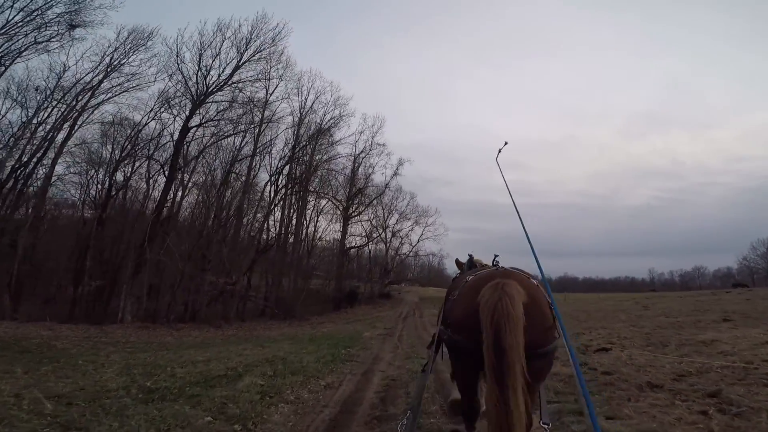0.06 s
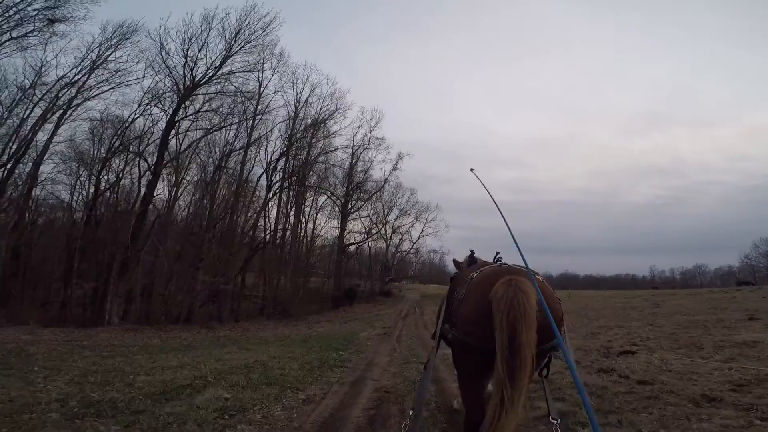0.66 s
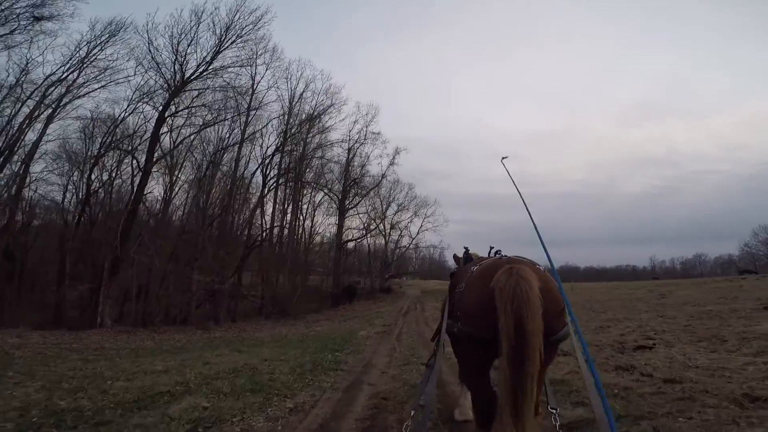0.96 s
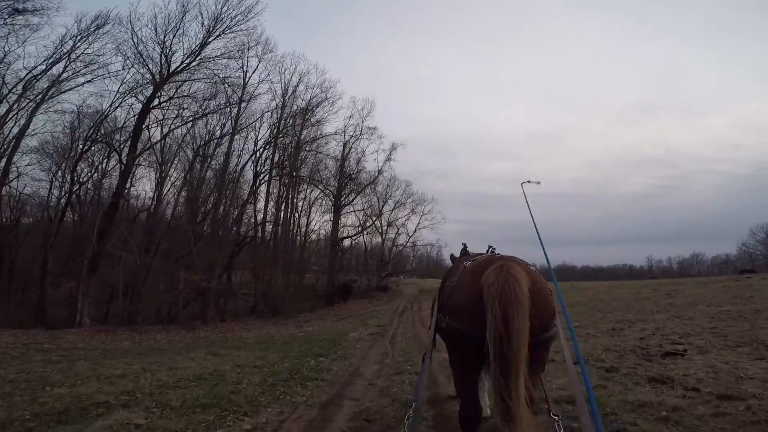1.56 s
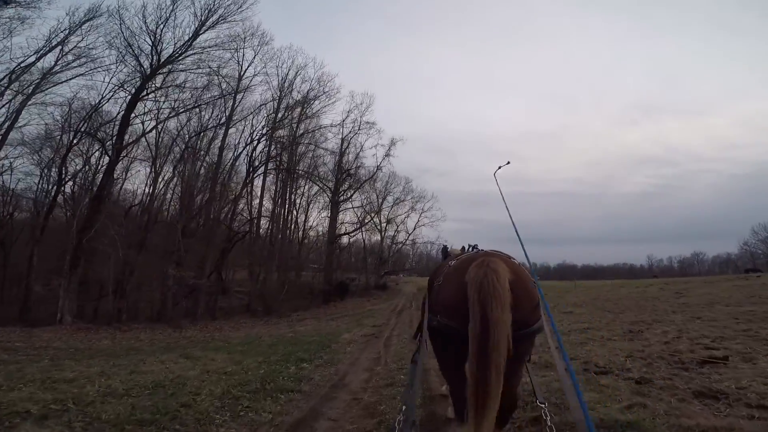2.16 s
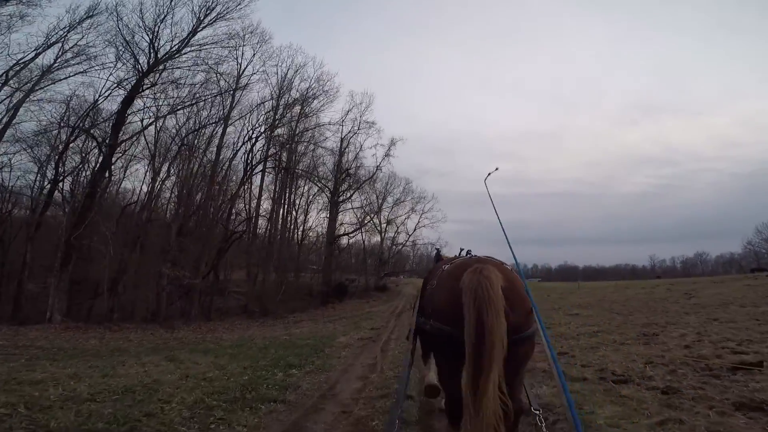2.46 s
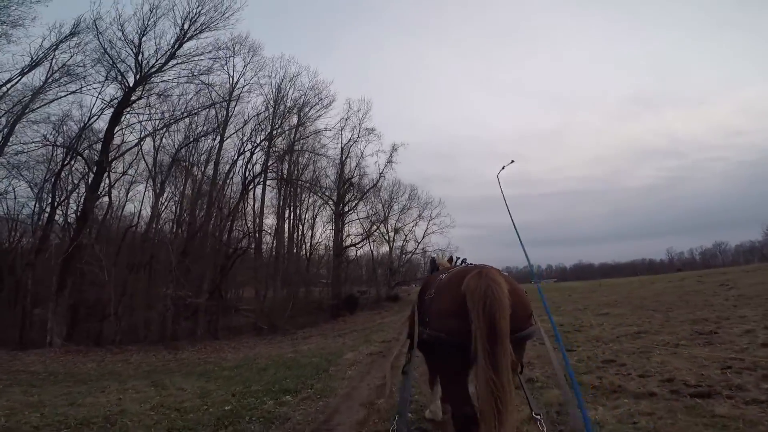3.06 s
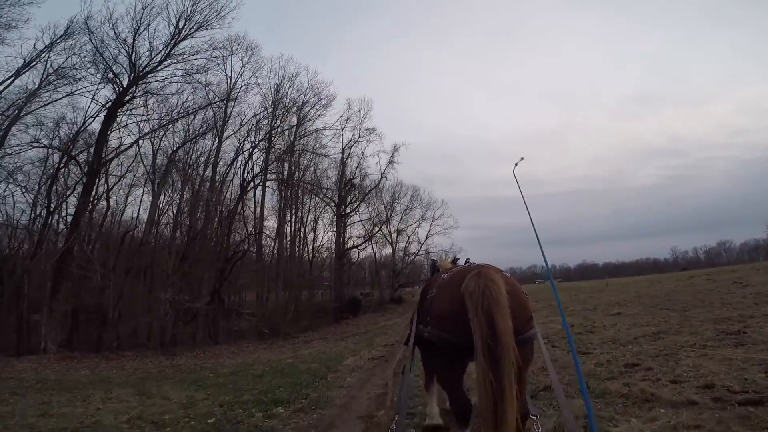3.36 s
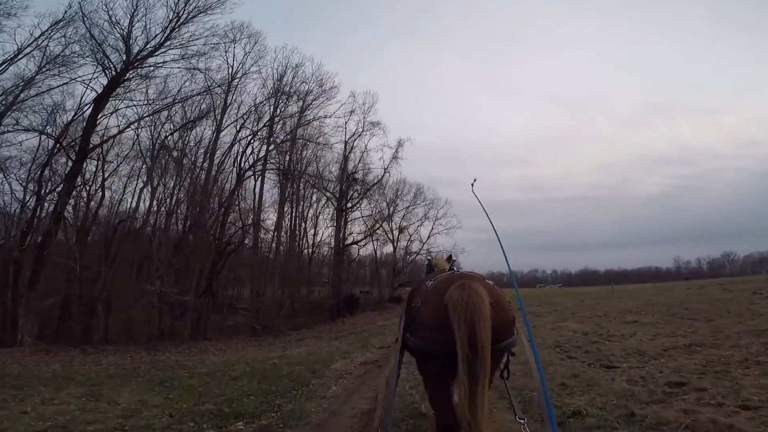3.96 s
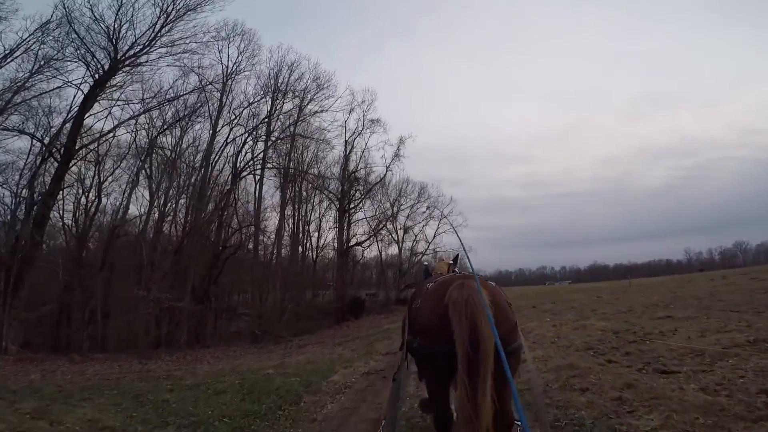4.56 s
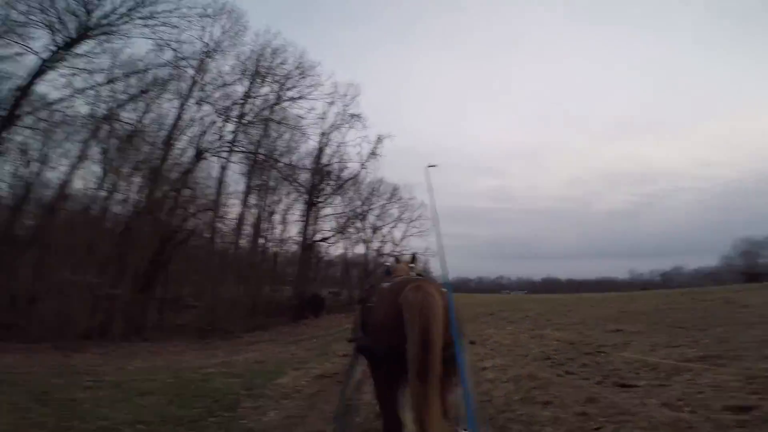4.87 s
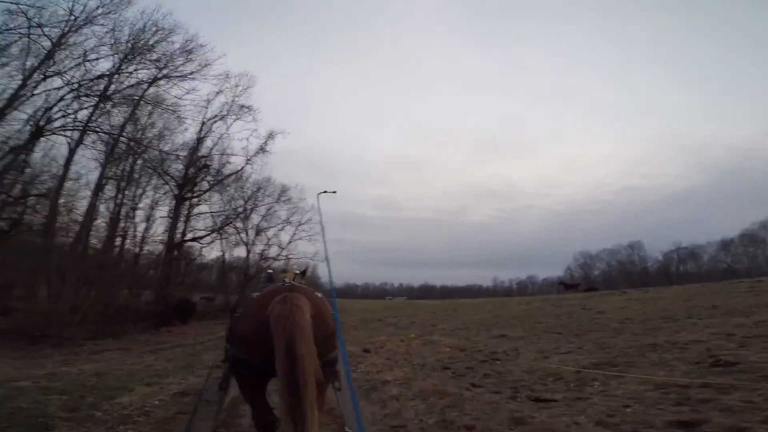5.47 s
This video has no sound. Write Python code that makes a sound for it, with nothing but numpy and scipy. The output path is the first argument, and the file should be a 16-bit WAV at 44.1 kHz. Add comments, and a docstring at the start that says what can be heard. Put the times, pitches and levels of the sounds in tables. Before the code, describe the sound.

A walking horse pulls a wooden sled across an open field, heard close up from the seat. The runners scrape and thump over clods with a low rumble, while grass hisses and wind buffets the microphone. Hooves crunch dry turf, chains click and boards knock. The ride grows smoother, then the hitch snaps taut with a sharp clack. Near the end come more bumps and two faint bird chirps on the left.

```python
"""A walking horse drags a wooden sled through an open field, heard from the seat. From the start grass
hisses, air buffets the microphone ports, and the runners scrape over clods that jolt the bed and drive
its resonances into a rumble. Hooves soon crunch into dry turf while chains click and wood knocks. By two
seconds the ground is smoother. Near 3.4 s friction makes a runner sing hoarsely, and the hitch snaps taut.
Near the end a small bird chirps twice on the left, with a last run of bumps between its calls."""
import sys
import numpy as np
from scipy import signal
from scipy.fft import rfft, irfft, next_fast_len
from scipy.io import wavfile
from scipy.ndimage import uniform_filter1d, map_coordinates

SR = 44100
rng = np.random.default_rng(int(sys.argv[2]) if len(sys.argv) > 2 else 0)


def bounce(signal):
    """Save signal as a 16-bit WAV file at the path given by the first command-line argument."""
    frames = np.transpose(np.atleast_2d(signal))
    limited = np.clip(frames, -1, 1)
    pcm = np.round(limited * 32767).astype(np.int16)
    wavfile.write(sys.argv[1], SR, pcm)


N = 242981

# Spectra of air, grass, dry stalks and earth. Each row: frequency in Hz, relative density in dB.
BUFFET_SPECTRUM = [(8, -8), (25, 12), (58, 14.5), (80, 15.5), (125, -15), (400, -107)]
GRASS_SPECTRUM = [(600, 2.5), (1200, 6), (1900, 6), (2500, 3.5), (3200, 4), (4500, 4), (6100, 5),
                  (7400, 1.5), (8300, -3), (9700, -6.5), (11200, -13.5), (12500, -12.5), (15000, -29)]
STALK_SPECTRUM = [(900, -34), (2200, 5), (3600, 3.5), (6200, 4.5), (7300, -1.5), (8400, -10.5),
                  (11000, -22.5), (15000, -54)]
EARTH_SPECTRUM = [(250, 9), (550, 9), (800, 10), (1150, 12), (1800, 3.5), (2800, -5), (6000, -60)]
# The bass over time. Each row: time in seconds, relative levels of the bed's boom and of buffeting in dB.
BASS_LEVELS = [(0.0, -44, -34.5), (0.38, -29, -42), (0.64, -29.5, -33), (0.79, -20.5, -24),
               (0.89, -26, -27.5), (1.1, -23.5, -23), (1.15, -31, -30), (1.35, -21, -25.5),
               (1.58, -30.5, -35), (2.01, -45.5, -39.5), (3.18, -57.5, -51), (3.38, -48, -38),
               (3.6, -55, -58), (3.9, -54, -59), (4.37, -69, -64), (4.6, -63, -68), (4.88, -72, -68),
               (4.98, -76, -54.5), (5.34, -51, -47), (5.51, -54, -51)]
# Thickness of the grass along the way. Each row: time in seconds, relative hiss level in dB.
GRASS_LEVELS = [(0.0, -42), (0.8, -43), (2.88, -46.5), (3.33, -45.5), (4.07, -47), (5.51, -46)]
# Bird calls. Each row: start and length in seconds, held pitch in Hz, relative level in dB,
# final fall as a fraction of the pitch.
CHIRPS = [(4.309, .058, 4400, -54, .05), (5.423, .066, 4340, -48.5, .25)]
# Shivers of the hitch chains. Each row: time of the peak in seconds, level in dB.
JINGLES = [(0.125, -47), (2.025, -50.5), (3.03, -51.5)]
# Links click and stems snap. Each row: start in seconds, relative noise level in dB, pitch in Hz,
# half bandwidth in octaves, level of the link's note in dB.
CLICKS = [(0.915, -31.5, 1890, 0.36, -45), (1.2635, -28.5, 2300, 0.47, -42),
          (1.266, -29.5, 6000, 0.18, -40), (1.468, -30.5, 4800, 0.53, -50), (1.541, -30, 2440, 0.27, -46),
          (1.554, -48, 3400, 0.53, -48), (1.688, -32.5, 4660, 0.16, -38), (1.695, -29, 4350, 0.28, -47),
          (1.992, -29, 5750, 0.092, -36), (2.4212, -30, 5300, 0.35, -35), (2.4241, -22.5, 3740, 0.84, -44),
          (2.648, -36.5, 6640, 0.25, -52), (2.9518, -31.5, 2900, 0.38, -35),
          (3.181, -32.5, 4400, 0.59, -50), (3.382, -31, 3600, 0.57, -52), (3.956, -31.5, 3350, 0.7, -27),
          (3.979, -29, 5060, 0.25, -42), (3.9801, -31.5, 3250, 0.35, -35), (4.354, -38, 3320, 0.1, -47),
          (4.361, -35.5, 2900, 0.79, -45), (4.42, -36, 2400, 0.78, -48), (4.572, -30, 2000, 1.4, -53)]
# The hitch snaps taut and rebounds. Each row: start in seconds, level in dB.
CLACKS = [(3.4761, -15), (3.5006, -21)]
# Loose boards and the hitch bar knock. Each row: start in seconds, level in dB, pitch in Hz,
# 60 dB decay time in seconds.
KNOCKS = [(0.456, -23, 703, 0.088), (0.584, -21.5, 595, .025), (0.617, -15, 1080, 0.035),
          (0.783, -25, 720, 0.043), (0.914, -23, 1020, .022), (1.033, -27, 520, 0.028),
          (1.216, -21, 600, 0.022), (1.541, -28, 1140, 0.016), (1.682, -24, 590, 0.019),
          (1.746, -22, 1070, 0.027), (1.8, -23, 1090, 0.026), (1.803, -23.5, 503, 0.058),
          (1.89, -24.5, 1070, 0.034), (1.991, -19.5, 1614, 0.025), (2.42, -19.5, 540, 0.016),
          (2.951, -23, 480, 0.02), (3.221, -24.5, 1090, 0.024), (3.344, -21.5, 996, 0.025),
          (3.4755, -12, 860, 0.0066), (3.602, -23, 1410, 0.019), (3.628, -28.5, 950, 0.04),
          (4.5708, -13.5, 424, 0.023), (4.583, -19, 1070, 0.016), (4.71, -27, 690, 0.1),
          (5.124, -25.5, 910, 0.026), (5.164, -26, 1170, 0.014), (5.257, -23.5, 483, 0.065),
          (5.265, -29, 1480, 0.024), (5.306, -28, 950, .022)]
# Hoof falls. Each row: landing time in seconds, relative levels of the earth and of the stalks in dB.
HOOF_FALLS = [(0.81, -44, -37.5), (0.922, -36, -44), (1.265, -35, -34.5), (1.545, -29, -30),
              (1.69, -45, -38), (1.809, -40, -50), (1.835, -33.5, -38.5), (1.993, -36.5, -37),
              (2.416, -35.5, -30), (2.708, -44, -39.5), (2.941, -37.5, -39), (2.954, -38, -35),
              (3.381, -39, -35), (3.604, -38, -42), (3.627, -39, -64), (4.017, -35, -35),
              (4.121, -45, -40.5), (4.358, -49, -48), (4.57, -32.5, -30.5), (4.832, -41.5, -35.5),
              (5.121, -34, -36), (5.245, -48, -44), (5.263, -42, -58)]
# Notes of a rubbing runner. Each row: frequency in Hz, level in dB.
RUB_NOTES = [(1085, -43), (1270, -46), (1800, -44.5)]
# The bed drops on bumps. Each row: start in seconds, relative level in dB, pitch in Hz,
# level of the deep heave in dB, 60 dB decay time in seconds.
JOLTS = [(0.464, -11, 207, -31, 0.07), (0.632, -7.5, 184, -38, 0.053), (0.713, -12, 217, -35, 0.099),
         (0.733, -12.5, 132, -26, 0.066), (0.7819, -4, 135, -20, 0.077), (0.7914, 3, 121, -17, 0.039),
         (0.932, -9.5, 223, -34, 0.044), (0.975, -8.5, 195, -24, 0.036), (0.997, -1, 161, -37, 0.041),
         (1.036, -7.5, 190, -32, .04), (1.055, -10, 238, -36, 0.071), (1.095, -16, 161, -36, 0.065),
         (1.219, -19, 200, -26, 0.03), (1.313, -9, 272, -19, 0.04), (1.36, -11, 198, -25, 0.035),
         (1.804, -15.5, 184, -32, .06), (2.4244, -8.5, 198, -25.5, 0.029), (2.95, -16, 199, -28.5, 0.054),
         (3.283, -16, 156, -46, .06), (3.353, -19, 172, -36, 0.051), (3.492, -20, 145.6, -50, .17),
         (3.809, -26, 210, -55, 0.074), (3.882, -26.5, 217.5, -60, 0.19), (4.5711, -11, 320, -50, 0.022),
         (4.595, -14, 233, -50, 0.1), (4.678, -15.5, 155, -53, 0.23), (4.721, -15.5, 239, -50, 0.068),
         (4.777, -21.5, 158, -55, .12), (5.259, -17, 296, -50, 0.078), (5.284, -14, 160, -50, 0.067)]
# Modes of the boards, the loaded bed and the runners. Each row: frequency and width in Hz, gain in dB.
BOARD_MODES = [(148, 15.6, 5), (180, 17.5, 0), (210.7, 32, -4), (265.7, 31, 0), (300.6, 38, -3.5),
               (375.2, 28.5, -3.5), (475, 40, -8)]
BED_MODES = [(108, 14, 0)]
RUNNER_MODES = [(546, 49, 6), (741, 91, 6.5), (1000, 101, 7), (1137, 120, 2.5), (1258, 57, 2.5),
                (1520, 205, -4), (1782, 106, 0.5), (2080, 540, -5.5), (3710, 1000, -7)]
# Roughness of the ground. Each row: time in seconds, relative level of the drag in dB.
DRAG_LEVELS = [(0.0, -35.5), (0.2, -36), (0.32, -30.5), (0.44, -29.5), (0.61, -27), (0.8, -28),
               (1.15, -31.5), (1.4, -25.5), (1.47, -34), (1.69, -31), (1.92, -39.5), (2.93, -44),
               (3.19, -39.5), (3.35, -37.5), (4.19, -44), (4.53, -43.5), (4.69, -27.5), (4.87, -42.5),
               (5.51, -41.5)]
# Patches of clods. Each row: start and length in seconds, levels of rumble and of scrape in dB.
CLOD_PATCHES = [(0.443, 0.045, -24.5, -42), (0.634, 0.033, -28.5, -36), (0.777, 0.049, -27, -38),
                (0.853, 0.023, -34, -41), (0.97, 0.039, -22.5, -38.5), (1.099, 0.14, -24.5, -42),
                (1.282, 0.079, -25.5, -36), (1.68, 0.074, -37, -42.5), (2.285, 0.084, -39, -54),
                (2.548, 0.087, -43, -47.5), (3.182, 0.11, -30.5, -42.5), (3.335, 0.037, -28.5, -47),
                (3.41, 0.11, -36, -42), (3.897, 0.03, -38.5, -45), (4.5, .012, -37, -44.5),
                (4.555, 0.041, -25, -38.5), (4.644, 0.036, -34, -58), (4.697, 0.042, -28.5, -38),
                (4.764, 0.057, -36.5, -46.5), (5.254, 0.026, -28.5, -42.5), (5.31, 0.046, -33, -50.5)]
# The two microphone ports. Each row: frequency in Hz, coherence from 0 to 1,
# phase lead of the left in radians, left minus right level in dB.
PORTS = [(30, 0, 0.5, -4), (58, 0, 1.5, -5), (108, 1, 0.35, 2), (308, 0.92, 0.4, 0), (650, 1, -1.65, -3.5),
         (970, 0, 1, -3), (1390, 0, -3.5, -6), (1900, 0.03, -5, -6), (3700, 0.82, -6.5, -4),
         (5070, 0, -6.5, -1), (6900, 0.65, -9, -2.5), (9200, 0, -12.5, -6.5), (12400, 0.5, -11, 0)]

# Until they reach the ports, two-row signals hold a direct part and a scattered part.
DIRECT_ONLY, MOSTLY_DIRECT = [[1], [0]], [[1], [.5]]


def amp(db):
    """Amplitude grows tenfold for every 20 dB."""
    return 10 ** (np.asarray(db) / 20)


def decay(t, t60):
    """Damping gives an exponential decay of 60 dB in t60 seconds."""
    return amp(-60 * t / t60)


def unit(x):
    """Normalisation brings x to an rms of 1."""
    return x / np.sqrt(np.mean(x ** 2) + 1e-20)


def clock():
    """Uniform sampling: the time of each sample in seconds."""
    return np.arange(N) / SR


def along(rows, hz, column=1):
    """Interpolation reads a table column on a logarithmic frequency axis."""
    table = np.transpose(rows)
    return np.interp(np.log(hz + 1), np.log(table[0] + 1), table[column])


def curves(rows):
    """Linear interpolation in time gives each later column one value per sample."""
    times, *columns = np.transpose(rows)
    return [np.interp(clock(), times, column) for column in columns]


def wobble(rate):
    """A spline through rate random knots a second gives a smooth fluctuation."""
    return map_coordinates(rng.standard_normal(int(N * rate / SR) + 4), [clock() * rate])


def swell(start, length, rise_s, fall_s):
    """Exponential growth until start, a hold, then decay; rise_s and fall_s each span 20 dB."""
    t = clock() - start
    return amp(20 * (np.minimum(t, 0) / rise_s - np.maximum(t - length, 0) / fall_s))


def add(out, sound, start):
    """Superposition: sound adds to out from start seconds on."""
    span = out[:, round(start * SR):][:, :sound.shape[1]]
    span += sound[:, :span.shape[1]]


def highpass(x, hz, order):
    """Attenuation below hz steepens with the order."""
    return signal.sosfilt(signal.butter(order, hz, 'high', fs=SR, output='sos'), x)


def lowpass(x, hz, order):
    """Attenuation above hz steepens with the order."""
    return signal.sosfilt(signal.butter(order, hz, 'low', fs=SR, output='sos'), x)


def band(x, hz, octaves):
    """A damped resonance passes a band reaching octaves to each side of hz."""
    edges = [hz / 2 ** octaves, hz * 2 ** octaves]
    return signal.sosfilt(signal.butter(2, edges, 'band', fs=SR, output='sos'), x)


def filtered(x, response):
    """Linear filtering multiplies the spectrum by a complex frequency response."""
    size = next_fast_len(N + SR // 2)
    return irfft(rfft(x, size) * response(np.fft.rfftfreq(size, 1 / SR)), size)[..., :N]


def coloured(x, spectrum):
    """Spectral shaping gives x the colour of a table, at rms 1."""
    return unit(filtered(x, lambda hz: amp(along(spectrum, hz))))


def resonate(x, modes, top_hz):
    """A body responds as the sum of its modes; soft ground dulls them above top_hz."""
    def response(f):
        body = sum((-1) ** k * amp(db) * 1j * f * width / (hz * hz - f * f + 1j * f * width)
                   for k, (hz, width, db) in enumerate(modes))
        return body / (1 + 1j * f / top_hz) ** 2
    return filtered(x, response)


def moving_contact(x, depth_db):
    """Modal excitation depends on position, so resonances wax and wane as the contact moves."""
    spectra = signal.stft(x, nperseg=1024)[2]
    drift = uniform_filter1d(rng.standard_normal(spectra.shape[1:]), size=2, axis=0)  # over frequency
    drift = uniform_filter1d(drift, size=5, axis=1)  # over time
    gain = amp(depth_db * np.clip(unit(drift), -2, 2))
    return unit(signal.istft(spectra * gain, nperseg=1024)[1][:, :N])


def grit(rate, spread_db):
    """Shot noise: about rate tiny contacts a second, at random times and of random size."""
    hit = rng.random(N) < rate / SR
    size = amp(spread_db * np.clip(rng.standard_normal(N), -2, 2))
    return unit(hit * size * rng.choice([-1, 1], (2, N)))


def wind():
    """Pressure fluctuations in moving air buffet the ports in low lumps."""
    _, buffet_db = curves(BASS_LEVELS)
    level = amp(buffet_db - 3 + 1.3 * wobble(20.7))
    return level * coloured(rng.standard_normal((2, N)), BUFFET_SPECTRUM)


def grass(flutter_db=1.3):
    """Friction of many dry blades brushing past sums to a fine hiss with a light crackle."""
    hiss_db, = curves(GRASS_LEVELS)
    crackle = amp(-13) * coloured(grit(rate=200, spread_db=5), STALK_SPECTRUM)
    level = amp(hiss_db - 4.5 + flutter_db * wobble(32))
    hiss = coloured(rng.standard_normal((2, N)), GRASS_SPECTRUM)
    return level * (hiss + crackle)


def whistle(start, length, hz, drop):
    """Frequency modulation: one voice of a bird slides up, holds its note and falls at the end."""
    t = np.clip(clock() - start, 0, length)
    progress = t / length
    slide = .24 * np.exp(-t / .008)
    pitch = hz * (1 - slide - drop * progress ** 10 + .006 * wobble(300))
    envelope = amp(2 * wobble(150)) * (1 - (2 * progress - 1) ** 6)
    return envelope * np.sin(2 * np.pi * np.cumsum(pitch) / SR)


def bird(upper_ratio=1.51, upper_lead_s=.007):
    """Biphonation: a small bird in the trees calls with two voices at once."""
    out = np.zeros(N)
    for start, length, hz, db, drop in CHIRPS:
        lower = whistle(start, length, hz, drop)
        upper = whistle(start - upper_lead_s, length, hz * upper_ratio, drop)
        out += amp(db) * (lower + amp(-8) * upper)
    return out * DIRECT_ONLY


def chain_jingles(ring_hz=5740, half_width_s=.034):
    """Many small collisions excite the links' resonance in one soft, bright shiver."""
    shiver = sum(amp(db) * np.exp(-((clock() - peak) / half_width_s) ** 2) for peak, db in JINGLES)
    return shiver * unit(band(grit(rate=1200, spread_db=2), ring_hz, octaves=.11))


def link_and_stem_clicks():
    """Impulsive excitation gives a crack, a rough, heavily damped ring and a link's brief note."""
    out = np.zeros((2, N))
    t = np.arange(SR // 20) / SR
    for start, db, hz, octaves, link_db in CLICKS:
        noise = rng.standard_normal((2, len(t)))
        burst = decay(t, t60=.006) + amp(-14) * decay(t, t60=.03)
        ring = unit(band(noise * burst, hz, max(octaves, .1)))
        crack = unit(band(noise * decay(t, t60=.0008), hz=1900, octaves=.8))
        link = amp(link_db) * decay(t, t60=.0075) * np.sin(2 * np.pi * hz * t)
        add(out, amp(db - 17) * (ring + amp(-7) * crack) + link * MOSTLY_DIRECT, start)
    return lowpass(out, hz=12500, order=2)


def hitch_clacks():
    """Sudden tension in the hitch makes a hard impulse, after which its iron ring vibrates briefly."""
    out = np.zeros((2, N))
    t = np.arange(SR // 20) / SR
    contact = highpass(signal.unit_impulse(len(t)), hz=1800, order=1)
    contact = lowpass(contact, hz=3600, order=14)
    contact /= np.abs(contact).max()
    for start, db in CLACKS:
        ring = unit(band(rng.standard_normal((2, len(t))), hz=3100, octaves=.13))
        clink = amp(-17) * decay(t, t60=.035) * ring
        add(out, amp(db) * (contact * DIRECT_ONLY + clink), start)
    return out


def wood_knocks(attack_s=.00037):
    """Struck wood vibrates freely on one damped mode, with a rougher overtone above it."""
    out = np.zeros((2, N))
    t = np.arange(SR // 10) / SR
    attack = 1 - np.exp(-t / attack_s)
    for start, db, hz, t60 in KNOCKS:
        note = np.sin(2 * np.pi * hz * t) * decay(t, t60) * MOSTLY_DIRECT
        overtone = unit(band(rng.standard_normal((2, len(t))), 1.57 * hz, octaves=.67))
        overtone *= amp(-18) * decay(t, t60=.018)
        add(out, amp(db) * attack * (note + overtone), start)
    return out


def hoof_crunches():
    """Brittle fracture: stalks snap ever louder under a hoof until the weight lands on the earth."""
    earth_level, stalk_level = np.zeros((2, N))
    for landing, earth_db, stalk_db in HOOF_FALLS:
        press = swell(landing, 0, rise_s=.034, fall_s=.026)
        press *= amp(-4.5 * (clock() < landing))  # a light touch, then the full weight at once
        earth_level += amp(earth_db + 1.5) * press
        stalk_level += amp(stalk_db - 3) * press
    earth = coloured(grit(rate=2500, spread_db=0), EARTH_SPECTRUM)
    stalks = coloured(grit(rate=4200, spread_db=2.5), STALK_SPECTRUM)
    return earth_level * earth + stalk_level * stalks


def runner_rub(peak_s=3.405, length_s=.2):
    """Stick-slip friction on firm ground sustains a few narrow resonances of a runner for a moment."""
    arch = np.maximum(1 - (2 * (clock() - peak_s) / length_s) ** 2, 0)
    slips = grit(rate=1200, spread_db=6.5)
    return arch * sum(amp(db) * unit(band(slips, hz, octaves=.05)) for hz, db in RUB_NOTES)


def bed_jolts(attack_s=.0023, heave_s=.0036):
    """Transient response: a big bump sets the bed in damped oscillation and heaves the whole sled."""
    out = np.zeros((2, N))
    t = np.arange(SR // 5) / SR
    attack = 1 - np.exp(-t / attack_s)
    u = t / heave_s
    heave = u * (2 - u) * np.exp(1 - u)  # one push and its slower rebound
    for start, db, hz, heave_db, t60 in JOLTS:
        shove = amp(db + 1) * attack * decay(t, t60) * np.sin(2 * np.pi * hz * t)
        radiated = highpass(shove, .78 * hz, order=2)  # the bed radiates little below its pitch
        add(out, (radiated + amp(heave_db) * heave) * DIRECT_ONLY, start)
    return out


def sled_drag():
    """Forced vibration: rough ground shakes the boards and loaded bed while grit scrapes the runners."""
    drag_db, = curves(DRAG_LEVELS)
    boom_db, _ = curves(BASS_LEVELS)
    rumble_level, scrape_level = amp(drag_db - 1.5), amp(drag_db - 9)
    for start, length, rumble_db, scrape_db in CLOD_PATCHES:
        bite = swell(start, length, rise_s=.028, fall_s=.055)
        rumble_level = np.hypot(rumble_level, amp(rumble_db) * bite)  # powers add
        scrape_level = np.hypot(scrape_level, amp(scrape_db) * bite)
    grip = amp(1.5 * wobble(45))  # the runners grip and let go
    boards = resonate(grit(rate=900, spread_db=2.5), BOARD_MODES, top_hz=880)
    boards = moving_contact(boards, depth_db=.5)
    rumble = unit(highpass(boards, hz=135, order=6))  # boards radiate little bass
    bed = resonate(grit(rate=600, spread_db=5.5), BED_MODES, top_hz=300)
    boom = amp(boom_db + 1.44) * unit(band(bed, hz=114.3, octaves=.36))
    runners = resonate(grit(rate=800, spread_db=1.5), RUNNER_MODES, top_hz=3680)
    scrape = moving_contact(runners, depth_db=4)
    return boom + grip * (rumble_level * rumble + scrape_level * scrape)


def ports(parts):
    """Direct sound differs in phase and level between two ports; scattered sound lowers coherence."""
    def response(hz, side):
        coherence, lead, lean_db = (along(PORTS, hz, column) for column in (1, 2, 3))
        angle = np.arccos(np.clip(coherence, 0, 1)) / 2
        shares = np.array([np.cos(angle), side * np.sin(angle)])
        centre_gain = np.sqrt((1 + coherence * np.cos(lead)) / 2 + .0012)
        return shares * np.exp(side * 1j * lead / 2) * amp(side * lean_db / 2) / centre_gain
    return np.array([filtered(parts, lambda hz: response(hz, side)).sum(axis=0) for side in (1, -1)])


def scene():
    """Sled, hooves, hitch and field superpose at the ports, with the bird off to the left."""
    sled_and_horse = sled_drag() + runner_rub() + bed_jolts() + hoof_crunches()
    rattles = link_and_stem_clicks() + hitch_clacks() + chain_jingles() + wood_knocks()
    field = grass() + wind()
    to_the_left = amp([[5], [-5]])
    return ports(sled_and_horse + rattles + field) + to_the_left * ports(bird())


def record(dry):
    """Band limiting removes everything above 15 kHz."""
    return filtered(dry, lambda hz: hz < 15000)


dry = scene()
out = record(dry)
bounce(out)
```